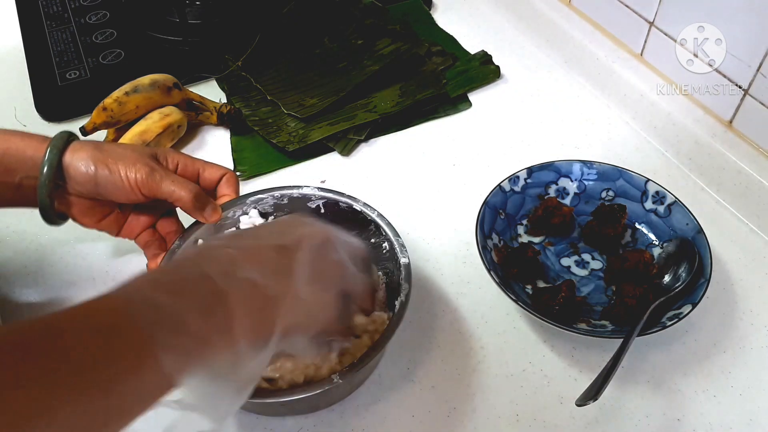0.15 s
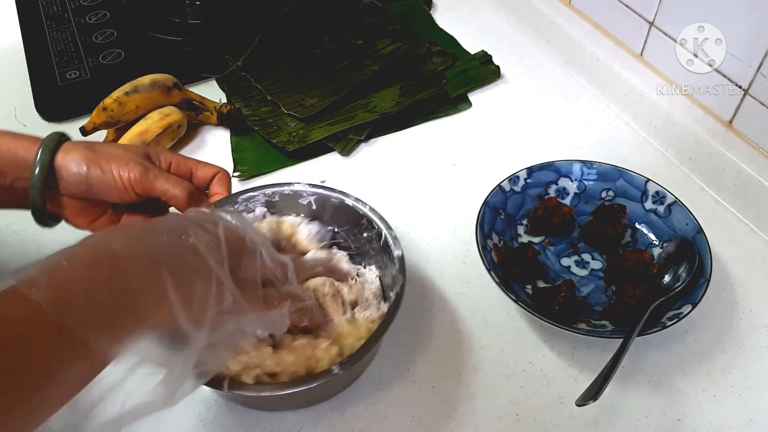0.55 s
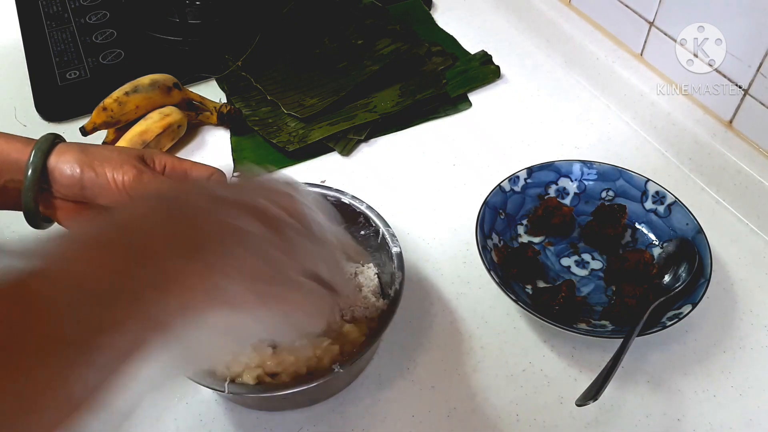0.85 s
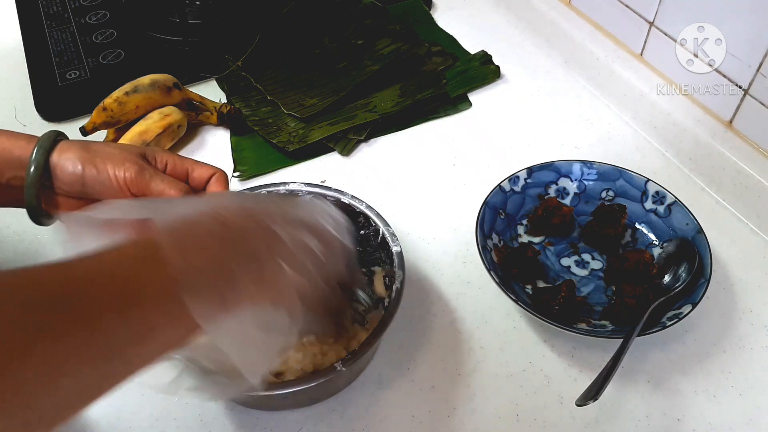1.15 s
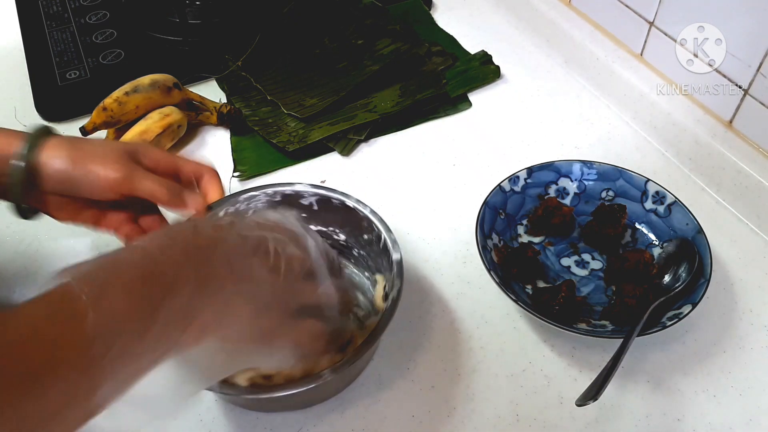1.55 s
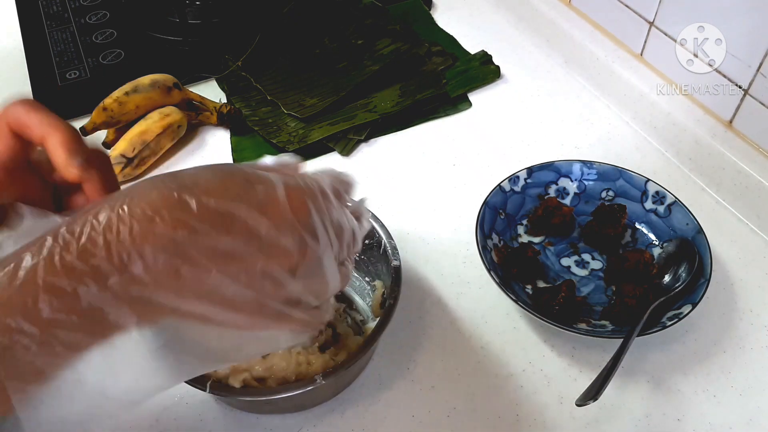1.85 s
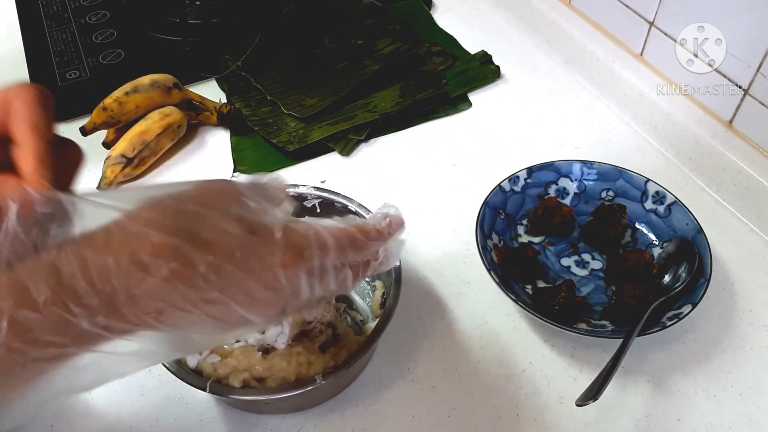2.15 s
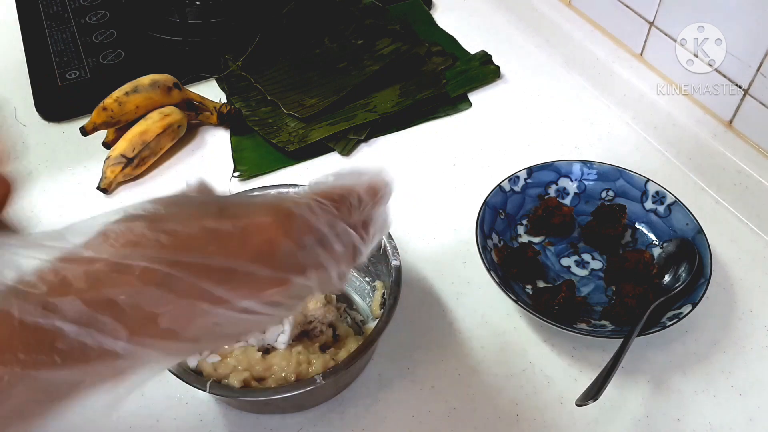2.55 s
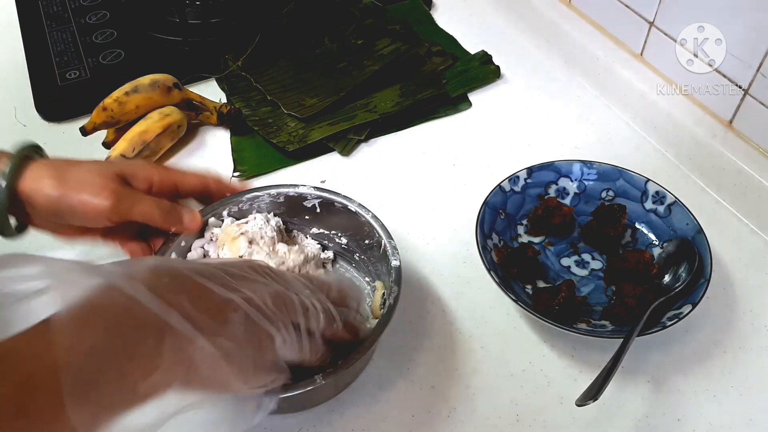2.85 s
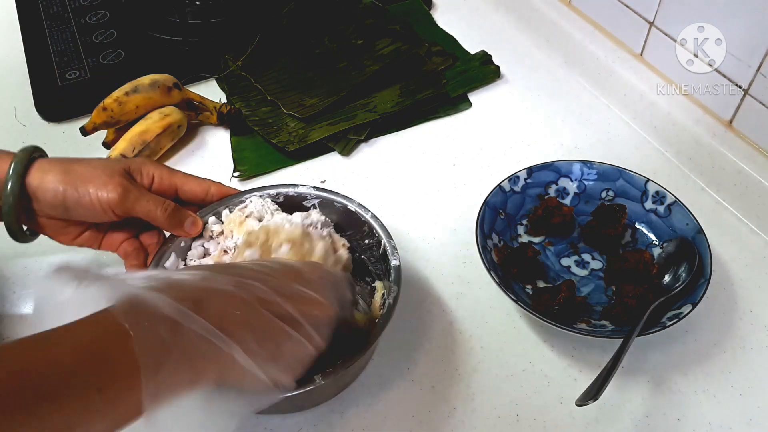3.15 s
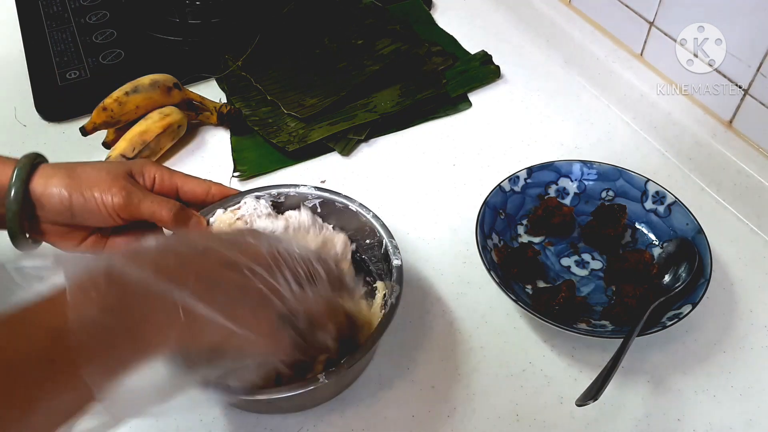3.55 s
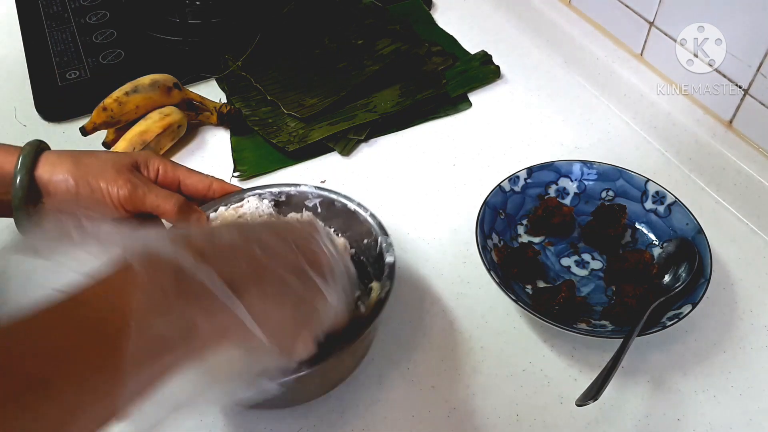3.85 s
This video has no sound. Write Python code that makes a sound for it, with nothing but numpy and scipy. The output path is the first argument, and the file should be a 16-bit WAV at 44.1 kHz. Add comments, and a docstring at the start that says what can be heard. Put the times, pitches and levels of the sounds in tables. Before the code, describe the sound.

Crinkly plastic-gloved hand squishing wet mixture in a metal bowl, ending with two hard bowl knocks

```python
"""Gloved hand kneading in a steel bowl

A thin plastic glove crinkles with every squeeze: random snaps of noise, denser as the level rises.
The damp mixture smears along the steel: duller snaps through a moving resonance and the ringing rim.
Presses thud and slaps land as shaped noise, the glove squeaks briefly, and a low rumble lies beneath.
The bowl taps the counter; near the end it tips and knocks down twice, loud enough to overload
the microphone: each push rings damped modes, a counter echo and the kitchen's reverberation."""
import sys
import numpy as np
from scipy import signal
from scipy.fft import rfft, irfft
from scipy.io import wavfile
from scipy.ndimage import uniform_filter1d

SR = 44100
rng = np.random.default_rng(int(sys.argv[2]) if len(sys.argv) > 2 else 0)


def digitize_waveform(pressure):
    """Quantize a signal to 16-bit integers and store it at the path in sys.argv[1].

    Rows of a 2-D input are taken as channels; values are limited to [-1, 1].
    """
    field = np.atleast_2d(pressure).T
    bounded = np.clip(field, -1, 1)
    quanta = np.round(bounded * 32767).astype(np.int16)
    wavfile.write(sys.argv[1], SR, quanta)


N = 176400  # samples: 4 s


def from_db(db):
    """Logarithmic level: decibels to amplitude gain."""
    return 10 ** (np.asarray(db) / 20)


def rms_one(x):
    """Normalisation: scale to unit root-mean-square."""
    return x / np.sqrt(np.mean(x ** 2) + 1e-20)


def in_time(rows):
    """Linear interpolation: a curve of (time, value) at every sample."""
    return np.interp(np.arange(N) / SR, *np.transpose(rows))


def at_hz(points, hz):
    """Logarithmic pitch: read a table along a log-frequency axis."""
    table_hz, values = np.transpose(points)
    return np.interp(np.log(np.maximum(hz, 1)), np.log(table_hz), values)


def pan(left_minus_right_db):
    """Interaural level difference: left and right gains, half the difference each."""
    return from_db(np.array([[left_minus_right_db], [-left_minus_right_db]]) / 2)


def band_pass(low, high, order):
    """Butterworth filter: second-order sections passing low to high (Hz)."""
    return signal.butter(order, [low, high], "band", fs=SR, output="sos")


def poles(hz, radius):
    """Damped oscillator: a conjugate pole pair, nearer the unit circle for a longer ring."""
    return [1, -2 * radius * np.cos(2 * np.pi * hz / SR), radius * radius]


def t60_radius(t60_s):
    """Exponential decay: the pole radius that falls 60 dB in t60_s."""
    return np.exp(-np.log(1000) / (t60_s * SR))


def resonate(x, modes):
    """Resonance: narrow modes (Hz, dB, t60 s) build up under a sound and ring on."""
    out = 0
    for hz, db, t60_s in modes:
        r = t60_radius(t60_s)
        unit_peak = (1 - r * r) / 2 * np.array([1, 0, -1])
        out = out + from_db(db) * signal.lfilter(unit_peak, poles(hz, r), x)
    return out


def drift(per_s):
    """Low-pass noise: a slow random wander of spread 1, with its corner near per_s (Hz)."""
    r = np.exp(-80 * np.pi * per_s / SR)  # computed at every 40th sample
    slow = signal.lfilter([1], [1, -2 * r, r * r], rng.standard_normal(N // 40 + 2002))
    slow = rms_one(slow[2000:])  # drop the filter's start-up
    return np.interp(np.arange(N) / 40, np.arange(len(slow)), slow)


# Likeness of the two channels in diffuse sound: frequency_hz, correlation [-1 to 1]
CHANNEL_LIKENESS = [(100,1),(250,0.57),(500,0.75),(1000,-0.032),(2000,-0.068),(5000,-0.05)]


def share_sides(hz):
    """Spatial coherence: middle and side gains that give the two channels their likeness."""
    alike = np.clip(at_hz(CHANNEL_LIKENESS, hz), -1, 1)
    return np.sqrt(1 + alike), np.sqrt(1 - alike)


def colour(x, spectrum):
    """Spectral shaping: give a stereo pair a spectrum and diffuse-field likeness; middle rms 1."""
    hz = np.fft.rfftfreq(x.shape[-1], 1 / SR)
    mid_gain, side_gain = share_sides(hz)
    a, b = rfft(x) * from_db(at_hz(spectrum, hz))
    mid, side = irfft(a * mid_gain, x.shape[-1]), irfft(b * side_gain, x.shape[-1])
    return np.array([mid + side, mid - side]) / mid.std()


# Colour of the kitchen's low rumble: frequency_hz, relative level_db
FLOOR_SPECTRUM = [(30,-32),(60,3.5),(85,2),(115,12.5),(170,-1),(280,-7),(600,-28),(2000,-10.5),(15000,-12)]
FLOOR_DB = -49


def kitchen_rumble():
    """Stationary noise: a steady random pair shaped to a low spectrum."""
    return from_db(FLOOR_DB) * colour(rng.standard_normal((2, N)), FLOOR_SPECTRUM)


def soft_blows(rows, spectrum, decay_s, attack_s):
    """Damped impact: each yielding contact shakes the bowl while it lasts, then dies away."""
    t, power = np.arange(N) / SR, 0
    for start_s, db, length_s in rows:
        rise = np.clip((t - start_s) / attack_s, 0, 1)
        fall = np.exp(-np.clip((t - start_s - length_s) / decay_s, 0, 20))
        power = power + (from_db(db) * rise * fall) ** 2
    shake = colour(rng.standard_normal((2, N)), spectrum)
    shake = shake / np.sqrt(uniform_filter1d(np.mean(shake ** 2, axis=0), size=1300))  # even level
    return np.sqrt(power) * shake


# The hand presses the lump down: start_s, level_db, length_s
PRESS_EVENTS = [(.071,-41.5,0.029),(.279,-35.5,0.011),(.335,-46,.03),(.396,-37.5,0.015),(.765,-41,0.024),(.90,-43.5,0.075),(.955,-52,0.067),(1.04,-35,0.031),(1.072,-37,0.022),(1.355,-42,0.02),(1.578,-41.5,0.01),(1.99,-48,0.016),(2.225,-48,0.025),(2.83,-47,0.019),(2.897,-42,0.042),(3.049,-43.5,0.021)]
# Colour of a press: frequency_hz, relative level_db
THUD_SPECTRUM = [(30,-25),(60,-60),(85,-4),(112,16.5),(135,-7),(170,-14),(300,-9),(600,-29)]


def presses():
    """Soft impact: a slow onset and low spectrum make a thud through the counter."""
    return soft_blows(PRESS_EVENTS, THUD_SPECTRUM, decay_s=0.026, attack_s=0.0048)


# Damp lumps slap against the bowl: start_s, level_db, length_s
SLAP_EVENTS = [(.392,-48,0.0098),(.546,-46,0.014),(.757,-42,0.025),(1.04,-51,0.043),(2.229,-36,0.024)]
# Colour of a slap: frequency_hz, relative level_db
SLAP_SPECTRUM = [(100,-6),(200,8.5),(400,-1.5),(550,7),(850,7.5),(1200,-8),(2500,-11),(6000,-21)]


def slaps():
    """Abrupt impact: a fast onset and short decay make a slap."""
    return soft_blows(SLAP_EVENTS, SLAP_SPECTRUM, decay_s=0.0057, attack_s=0.0004)


# Brief squeaks of the glove: middle_s, half_length_s, pitch_hz, level_db
SQUEAK_EVENTS = [(1.3,0.03,1860,-43),(2.001,.018,2586,-45),(2.056,0.04,546,-47),(2.383,0.017,555,-42.5)]
SQUEAK_WIDTH_HZ = 12


def squeaks():
    """Frictional tone: the glove drags on the steel, a wavering pitch that swells and fades."""
    t, out = np.arange(N) / SR, 0
    for middle_s, half_length_s, hz, db in SQUEAK_EVENTS:
        swell = np.exp(-((t - middle_s) / half_length_s) ** 2 / 2)
        sine = drift(SQUEAK_WIDTH_HZ) * np.sin(2 * np.pi * hz * t)
        cosine = drift(SQUEAK_WIDTH_HZ) * np.cos(2 * np.pi * hz * t)
        out = out + from_db(db) * swell * (sine + cosine)
    return out


# Modes of the free steel rim: frequency_hz, relative level_db
RIM_MODES = [(1365,0),(1525,2),(1715,-4.5),(1835,-3.5),(1910,-1.5),(2690,-3)]
RIM_T60_S = 0.098


def rim(x, drive_db):
    """Sympathetic resonance: the free steel rim rings when the bowl is rubbed or struck."""
    return resonate(x, [(hz, db + drive_db, RIM_T60_S) for hz, db in RIM_MODES])


# Kitchen reverberation: frequency_hz, t60_s
ROOM_T60 = [(100,0.37),(300,0.33),(600,0.59),(1200,0.28),(4000,0.19),(15000,0.088)]
ROOM_BUILD_S = 0.001


def kitchen():
    """Reverberation: a dense stereo tail of unit energy, each octave or so dying at its own rate."""
    t, edges = np.arange(SR // 2) / SR, np.geomspace(40, 18000, 10)
    tail = 0
    for low, high in zip(edges, edges[1:]):
        hz = np.sqrt(low * high)
        noise = signal.sosfilt(band_pass(low, high, 2), rng.standard_normal((2, SR)))
        mid, side = noise[:, -len(t):]
        mid_gain, side_gain = share_sides(hz)
        pair = mid_gain * mid + side_gain * side * [[1], [-1]]
        local_power = uniform_filter1d(pair ** 2, size=int(6 * SR / hz), axis=1)
        swell = np.sqrt(local_power / np.mean(pair ** 2))  # divided out, so the decay is even
        tail = tail + pair / swell * np.exp(-np.log(1000) * t / at_hz(ROOM_T60, hz))
    build_up = 1 - np.exp(-t / ROOM_BUILD_S)
    return rms_one(tail * build_up) / np.sqrt(len(t))


# The bowl taps and knocks on the counter: start_s, relative level_db, contact_s, extra_bass_db
KNOCK_EVENTS = [(0.345,-29.5,0.00088,0),(1.352,-30.5,0.0007,-2),(2.384,-29.5,0.0005,-10),(3.3312,-2.5,0.00071,-7.5),(3.935,-7.5,0.00086,7.5),(3.9435,-13.5,0.00041,-1),(3.9563,-25,0.00091,11)]
# Modes of the loaded bowl and counter: frequency_hz, relative level_db, t60_s, left_minus_right_db
BOWL_MODES = [(95,-21.5,0.42,0),(115.7,-16.5,0.21,0),(170,-14,0.036,-7),(255,-19.5,0.022,-11),(382,-8.5,0.015,17),(538,-12,0.047,12),(620,-4,0.023,-2),(760,-6.5,0.014,3),(900,-0.5,0.0065,-15),(993,-8.5,0.015,-17),(1195,-3.5,0.019,-4),(1390,-19,0.026,15),(1983,-1.5,0.018,6)]
# Standing waves of the kitchen that outlast a knock: frequency_hz, relative level_db, t60_s
STANDING_WAVES = [(326,10,0.37),(557,3,1),(640,4,0.58),(1000,-21,0.4)]
BASS_BELOW_HZ, LOW_CUT_HZ, KNOCK_TOP_HZ = 860, 60, 2560
RIGHT_LEAD_S = 0.00027
COUNTER_ECHO_S, COUNTER_ECHO_GAINS = 0.00214, (0.36, 1.0)  # gains: left, right
RIM_KNOCK_DB, KNOCK_ROOM_DB, ROOM_ABOVE_HZ = -9, -3, 107


def knocks():
    """Modal impact: a short rounded push rings the modes, then come the echo and the room answer."""
    t, out = np.arange(N) / SR, np.zeros((2, N))
    for start_s, db, contact_s, bass_db in KNOCK_EVENTS:
        push = np.sin(np.pi * np.clip((t - start_s) / contact_s, 0, 1)) ** 2
        push = push / push.sum() + 1e-18  # the trace keeps the filters off vanishing numbers
        for hz, mode_db, t60_s, pan_db in BOWL_MODES:
            ring = signal.lfilter([.5, 0, -.5], poles(hz, t60_radius(t60_s)), push)
            extra_bass_db = bass_db / (1 + (hz / BASS_BELOW_HZ) ** 2)
            out -= pan(pan_db) * from_db(db + mode_db + extra_bass_db) * ring
    out = signal.sosfilt(band_pass(LOW_CUT_HZ, KNOCK_TOP_HZ, 4), out)
    direct = np.array([np.interp(t - RIGHT_LEAD_S, t, out[0]), out[1]])
    mid = out.mean(axis=0)
    echo = np.array(COUNTER_ECHO_GAINS)[:, None] * np.interp(t - COUNTER_ECHO_S, t, mid)
    high_pass = signal.butter(2, ROOM_ABOVE_HZ, "high", fs=SR, output="sos")
    radiated = signal.sosfilt(high_pass, mid)
    room = signal.fftconvolve(np.atleast_2d(radiated), kitchen(), axes=1)[:, :N]
    ringing = rim(mid, RIM_KNOCK_DB) + resonate(mid, STANDING_WAVES)
    return direct + echo + ringing + from_db(KNOCK_ROOM_DB) * room


SCATTER_S = 0.00068  # amplitude decay time of one snap


def snaps(rate, spread_db):
    """Shot noise: power of random snaps of uneven size, each dying quickly; local mean 1."""
    happens = rng.random(N) < rate / SR
    size_db = spread_db * np.minimum(rng.exponential(1, N), 5)
    power = happens * from_db(size_db) ** 2
    power = signal.lfilter([1], [1, -np.exp(-2 / (SCATTER_S * SR))], power + 1e-6)
    return power / uniform_filter1d(power, size=2000)


# Reflections off the bowl wall: mean delay_s, gain
WALL_REFLECTIONS = [(.00047,.14),(.0043,.2)]
SWAY_S, SWAY_PER_S = .00015, 3  # rms wander of each delay, and its rate (Hz)


def bowl_walls(x):
    """Comb filtering: short reflections of wandering length keep shifting the rustle's colour."""
    t, ears = np.arange(N) / SR, []
    for ear in x:
        reflected = 0
        for delay_s, gain in WALL_REFLECTIONS:
            reflected = reflected + gain * np.interp(t - delay_s - SWAY_S * drift(SWAY_PER_S), t, ear)
        ears.append(ear + reflected)
    return np.array(ears)


# Edges of the bands a snap may stay within: frequency_hz
SNAP_EDGES_HZ = [150, 900, 2000, 3600, 6200, 9500, 16500]
RATE_FOLLOWS = 0.94  # dB of snap rate per dB of level
BROAD_SHARE = 0.34  # share of snap power spanning all bands
DIFFUSE_SHARE, DIFFUSE_S = 0.77, 0.0031  # wash after each snap: share of power, decay time
FLICKER_DB, FLICKER_PER_S = 1.24, 11  # rms level wander of each band, and its rate (Hz)


def crackle(level_db, per_s, spread_db, spectrum):
    """Crackling noise: snaps, broad or in one band, grow denser with effort and leave a wash."""
    rate = per_s * from_db(RATE_FOLLOWS * (level_db - level_db.mean()))
    broad, out = snaps(rate, spread_db), 0
    white, hz = rfft(rng.standard_normal((2, N))), np.fft.rfftfreq(N, 1 / SR)
    keep = np.exp(-1 / (DIFFUSE_S * SR))
    for low, high in zip(SNAP_EDGES_HZ, SNAP_EDGES_HZ[1:]):
        power = BROAD_SHARE * broad + (1 - BROAD_SHARE) * snaps(rate / 2, spread_db)
        wash = signal.lfilter([1 - keep], [1, -keep], power)
        power = (1 - DIFFUSE_SHARE) * power + DIFFUSE_SHARE * wash
        band = irfft(white * ((hz >= low) & (hz < high)), N)
        out = out + band * np.sqrt(power) * from_db(FLICKER_DB * drift(FLICKER_PER_S))
    return from_db(level_db) * rms_one(bowl_walls(colour(out, spectrum)))


# Resonance of the hollow between hand and bowl: time_s, frequency_hz
HOLLOW_PITCH = [(0,1600),(.55,1650),(.75,2400),(1.0,1650),(1.35,1850),(1.6,1460),(2.0,2680),(2.6,2700),(2.85,1880),(3.15,1180),(3.6,1400),(3.9,1390)]
HOLLOW_WIDTH_HZ = 570


def hollow(x):
    """Cavity resonance: a broad peak whose pitch moves, stepped in short blocks."""
    out, state, centre_hz = np.zeros_like(x), np.zeros((2, 2)), in_time(HOLLOW_PITCH)
    r = np.exp(-np.pi * HOLLOW_WIDTH_HZ / SR)
    unit_peak = (1 - r * r) / 2 * np.array([1, 0, -1])
    for i in range(0, N, 128):
        block = slice(i, i + 128)
        out[:, block], state = signal.lfilter(unit_peak, poles(centre_hz[i], r), x[:, block], zi=state)
    return out


# Rubbing of the food along the bowl: time_s, level_db before FOOD_DB
RUB_LEVEL = [(0.0,-40),(0.08,-38),(0.24,-41),(0.29,-44),(0.38,-40.5),(0.55,-42.5),(0.61,-43.5),(0.74,-37.5),(0.91,-44),(1.03,-40),(1.21,-42.5),(1.4,-41),(1.5,-45),(1.58,-38),(1.8,-46),(2.19,-42),
             (2.24,-34),(2.31,-44.5),(2.6,-42),(2.66,-48.5),(2.76,-48.5),(2.83,-40.5),(3.03,-38),(3.3,-46),(3.37,-37),(3.5,-44),(3.68,-39.5),(3.77,-44.5),(3.89,-39),(4.0,-35)]
# Colour of the damp mixture: frequency_hz, relative level_db
FOOD_SPECTRUM = [(180,-14.5),(430,-49),(540,-9),(720,-6.5),(920,-1),(1250,-4),(1550,-3.5),(2000,-3.5),(2700,-4.5),(4500,-12),(9000,-15.5)]
FOOD_DB, FOOD_PAN_DB, HOLLOW_DB, RIM_RUB_DB = 4.5, -1.3, -7, 0.5


def food():
    """Stick-slip friction: the damp mixture catches on the steel, coloured by hollow and rim."""
    smear = crackle(in_time(RUB_LEVEL), per_s=1200, spread_db=1.5, spectrum=FOOD_SPECTRUM)
    rubbed = smear + from_db(HOLLOW_DB) * hollow(smear) + rim(smear, RIM_RUB_DB)
    return from_db(FOOD_DB) * pan(FOOD_PAN_DB) * rubbed


# Crinkling of the glove as the hand works: time_s, level_db before FILM_DB
GLOVE_LEVEL = [(0.0,-33),(0.17,-36),(0.24,-37),(0.29,-44),(0.34,-42),(0.4,-34),(0.47,-39),(0.555,-31.5),(0.6,-39),(0.77,-31),(0.85,-37),(1.06,-34.5),(1.1,-38.5),(1.21,-39.5),(1.34,-34),
               (1.44,-35),(1.49,-42.5),(1.56,-35.5),(1.64,-33.5),(1.7,-35),(1.74,-40.5),(2.18,-34),(2.25,-28.5),(2.31,-35.5),(2.39,-33.5),(2.42,-35.5),(2.51,-36),(2.56,-32.5),(2.6,-31),(2.67,-43.5),
               (2.9,-31.5),(2.95,-36),(3.07,-33.5),(3.19,-41.5),(3.33,-37.5),(3.37,-33.5),(3.5,-38),(3.54,-36.5),(3.71,-38),(3.75,-43),(3.9,-35.5),(4.0,-41)]
# Colour of the thin film: frequency_hz, relative level_db
FILM_SPECTRUM = [(200,-12),(600,-1),(1500,-16),(2800,0.5),(4200,1),(5800,-1),(6700,0.5),(7700,4),(8700,-1.5),(9700,-3.5),(12000,1),(15500,-0.5)]
FILM_DB, FILM_PAN_DB = 3.5, -1.1


def glove():
    """Buckling: the thin film snaps between shapes in thousands of bright crinkles."""
    crinkles = crackle(in_time(GLOVE_LEVEL), per_s=4200, spread_db=2, spectrum=FILM_SPECTRUM)
    return from_db(FILM_DB) * pan(FILM_PAN_DB) * crinkles


KNOCK_PAN_DB, BASS_PAN_DB = -1, -4  # left minus right


def scene():
    """Superposition: rumble, presses, slaps, squeaks, knocks, food and glove add linearly."""
    bass = pan(BASS_PAN_DB) * (kitchen_rumble() + presses())
    contacts = pan(FOOD_PAN_DB) * slaps() + squeaks() + pan(KNOCK_PAN_DB) * knocks()
    return bass + contacts + food() + glove()


CLIP_TOP, CUTOFF_HZ = .98, 15700  # full scale is 1


def record(dry):
    """Overload and band limit: the loudest peaks clip, then the top is cut."""
    low_pass = signal.firwin(401, CUTOFF_HZ, fs=SR, window=("kaiser", 8))
    clipped = np.clip(dry, -CLIP_TOP, CLIP_TOP)
    return signal.fftconvolve(clipped, low_pass[None], mode="same", axes=1)


dry = scene()
out = record(dry)
digitize_waveform(out)
```